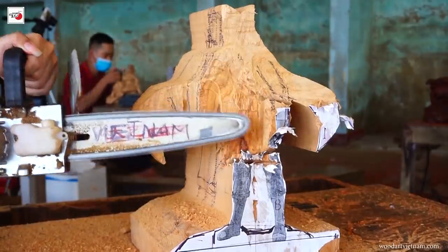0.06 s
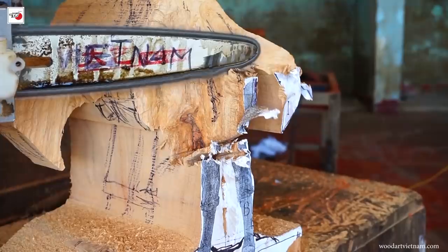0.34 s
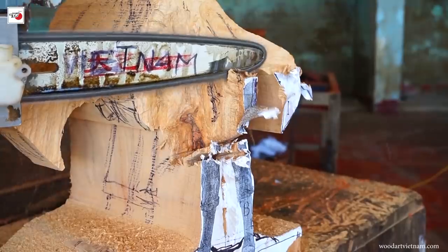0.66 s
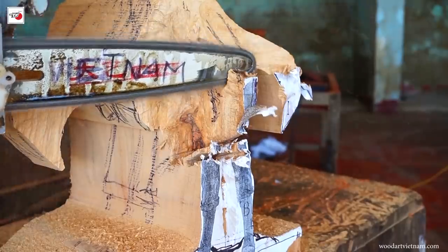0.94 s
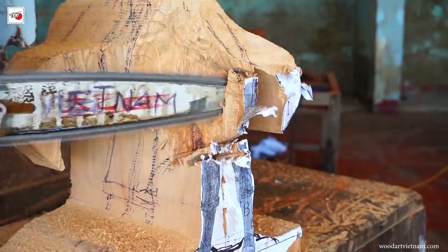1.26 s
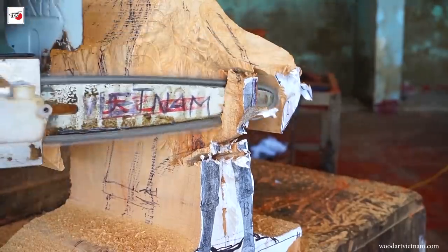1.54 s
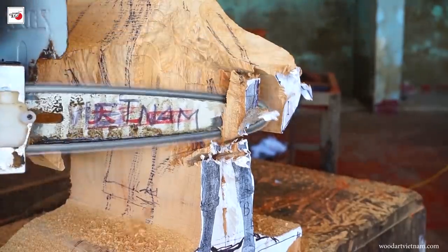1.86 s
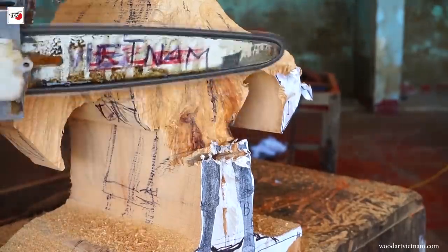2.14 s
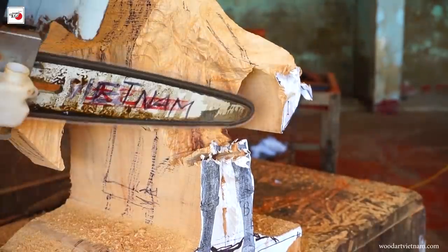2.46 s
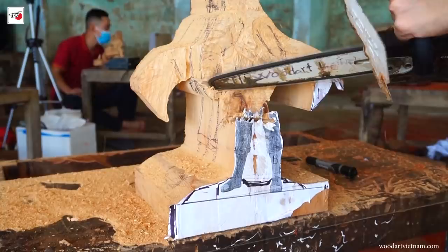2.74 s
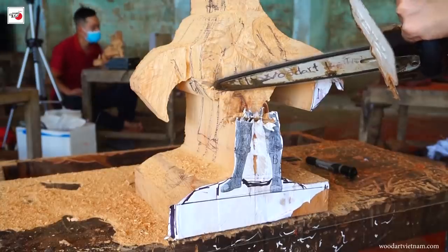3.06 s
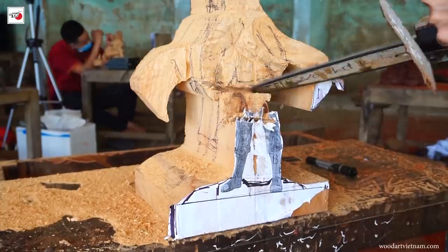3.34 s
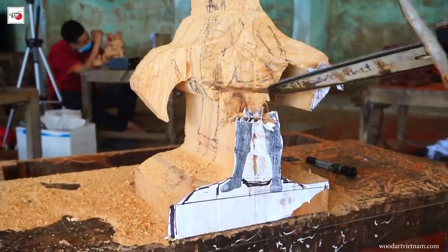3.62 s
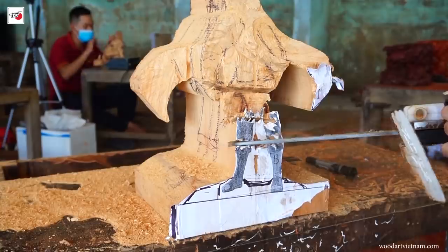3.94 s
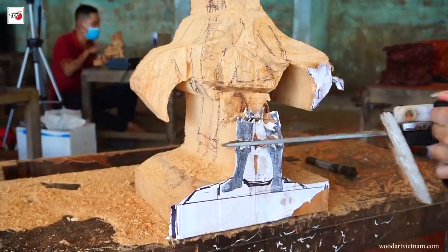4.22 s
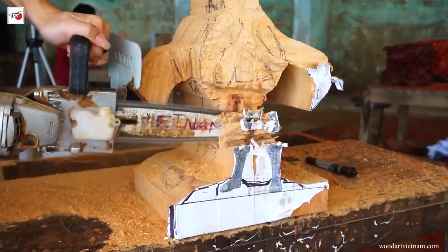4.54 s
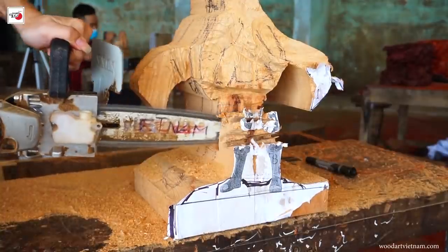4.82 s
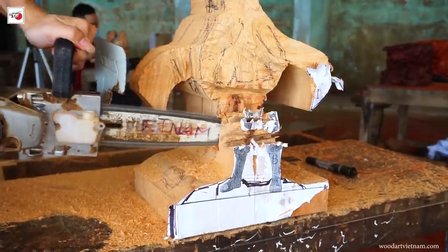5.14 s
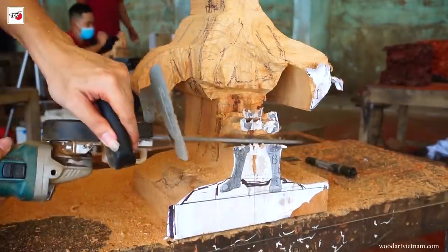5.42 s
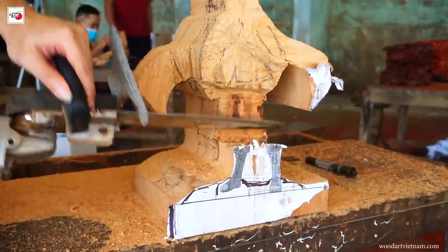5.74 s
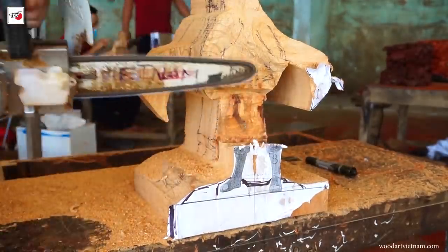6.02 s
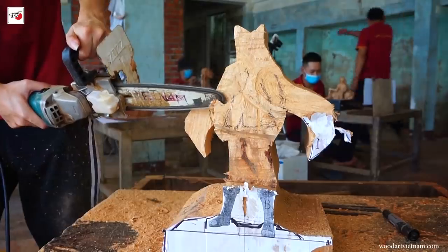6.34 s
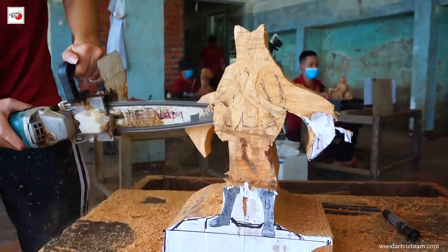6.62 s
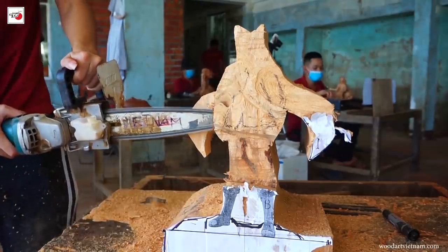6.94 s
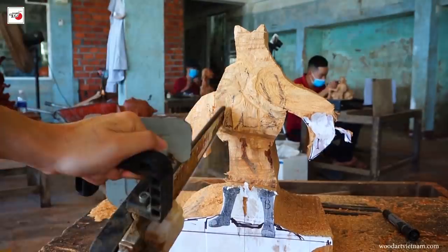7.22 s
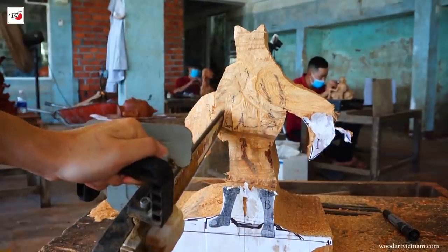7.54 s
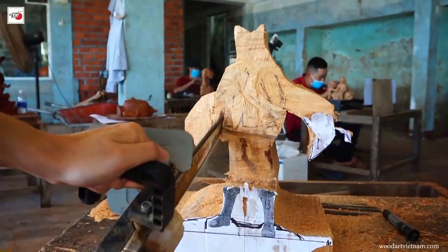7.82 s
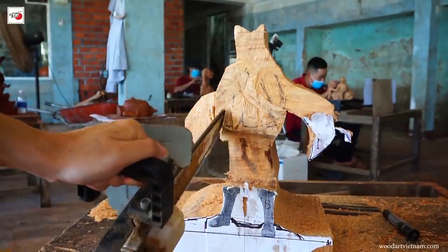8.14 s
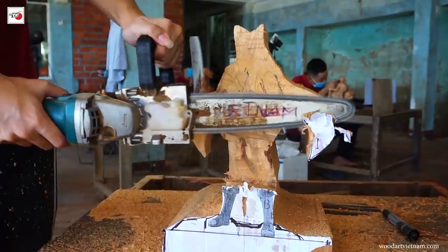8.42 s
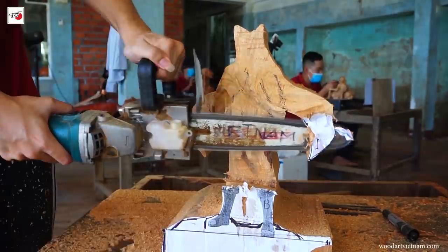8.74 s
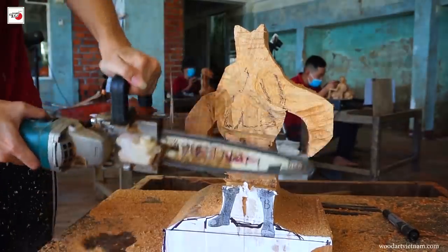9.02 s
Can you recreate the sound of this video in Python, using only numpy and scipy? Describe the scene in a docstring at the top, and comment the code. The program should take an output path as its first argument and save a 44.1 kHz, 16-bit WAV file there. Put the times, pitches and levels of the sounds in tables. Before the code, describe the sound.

Close, continuous power carving of wood: chain teeth tear and chips hiss, the tone shifting abruptly as the steel bar rings and squeals.

```python
"""Power carving at the bench

Close up in a workshop, in stereo: a chain bar on an electric grinder carves a wooden statue, the sound
changing abruptly from one stretch to the next. Teeth tear at the wood, chips hiss, the block knocks and
loose wood drops on the bench. The motor's whine sags under load; the bar rings and squeals in the kerf,
and near the end lies flat on the wood and growls."""
import sys
import numpy as np
from scipy import signal
from scipy.fft import rfft, irfft, next_fast_len
from scipy.io import wavfile
from scipy.ndimage import uniform_filter1d

SR = 44100
rng = np.random.default_rng(int(sys.argv[2]) if len(sys.argv) > 2 else 0)


def to_wav(sig):
    """Store sig (one row per channel, or 1-D mono) as 16-bit WAV at the path in sys.argv[1].

    Samples outside -1..1 are clipped; the rate is SR.
    """
    pcm = np.clip(np.atleast_2d(sig), -1, 1) * 32767
    pcm = np.round(pcm).astype(np.int16)
    wavfile.write(sys.argv[1], SR, pcm.T)  # frames by channels


N = 404838
T = np.arange(N) / SR
HZ = np.fft.rfftfreq(N, 1 / SR)


def amp(db):
    """Decibels to gain."""
    return 10 ** (np.asarray(db) / 20)


def unit(x):
    """Scales to rms 1."""
    return x / np.sqrt(np.mean(x ** 2) + 1e-20)


def curve_at(points, hz):
    """Joins a spectrum's points on a log-frequency axis."""
    point_hz, value = np.transpose(points)
    return np.interp(np.log(hz + 1), np.log(point_hz + 1), value)


def colour(x, gain):
    """Filters by a gain given on the frequency grid HZ."""
    size = next_fast_len(N)
    return irfft(rfft(x, size) * np.interp(np.fft.rfftfreq(size, 1 / SR), HZ, gain), size)[..., :N]


def wander(hz, on=slice(None)):
    """Random drift of rms 1, with about hz changes a second."""
    return unit(np.interp(T[on] * hz, np.arange(N // 8), rng.standard_normal(N // 8)))


def gate(start, end, fade_s):
    """1 between two times, with sloping ends."""
    return np.clip((T - start) / fade_s + .5, 0, 1) * np.clip((end - T) / fade_s + .5, 0, 1)


# How alike the left and right microphones hear the bench: frequency_hz, correlation
MIC_LIKENESS = [(60, .7), (350, 1), (700, 0.96), (2800, 0.58), (5600, 0.2), (16000, .11)]


def spread(pair, gain):
    """Colours two unrelated signals into left and right: bass alike, treble diffuse, middle at rms 1."""
    alike = np.clip(curve_at(MIC_LIKENESS, HZ), 0, 1)
    mid = colour(pair[0], gain)
    side = colour(pair[1], gain * np.sqrt((1 - alike) / (1 + alike)))
    return np.array([mid + side, mid - side]) / mid.std()


def noise_band(hz, width_hz):
    """A band of noise along a pitch curve, at both microphones; a fuzzy note when narrow."""
    pole = np.exp(-np.pi * width_hz / SR)
    noise = rng.standard_normal((2, len(hz))) + 1j * rng.standard_normal((2, len(hz)))
    slow_noise = signal.lfilter([1], np.poly([pole, pole]), noise)
    left, other = (slow_noise * np.exp(2j * np.pi * np.cumsum(hz) / SR)).real
    alike = np.clip(curve_at(MIC_LIKENESS, hz), 0, 1)
    return unit(np.array([left, alike * left + np.sqrt(1 - alike ** 2) * other]))


# Stretches of sawing, each changing abruptly to the next in loudness, colour and position:
# start_s, first_bite_db, last_bite_db, hiss_db, block_db, left_over_right_db, chatter_db, edge_db
STRETCHES = [(0, -24.4, -25.3, -23.2, -54, 3.5, 0.5, 1.5), (.355, -30.4, -27.3, -25.3, -66.5, 5.5, 1.6, -3),
             (.92, -29.7, -32.7, -28.2, -71, 4.5, 2.9, -4.5), (1.45, -26.5, -22, -23.5, -59.5, 2, 1.5, 0),
             (1.85, -23, -26.8, -22.8, -68, 1.8, 1.2, -1), (2.3, -28.3, -27.3, -23, -73, 2.5, 2.3, -1),
             (2.8, -26.6, -23.6, -22.8, -61, -1.9, 0.5, -.5),
             (3.43, -25.6, -23.7, -24.4, -61, -1.9, 1, -0.5), (3.75, -22, -24.5, -22.5, -55, -2, 0, .3),
             (4.33, -23, -23.5, -23.3, -48.5, 1.4, 2, 0.5),
             (5.25, -21.7, -23.6, -23.1, -54.5, .6, 0.9, 1.2),
             (6.17, -23.4, -22.1, -22.4, -57.5, 1.3, 0.2, .7),
             (7.199, -21.6, -22.3, -24.8, -47, 1.4, 1.2, 3.3),
             (8.3, -22.7, -22.2, -24.5, -48, 1.6, 1.7, 1.5), (8.969, -24.4, -24.4, -23.6, -57, 3, 2, 1.5)]
HISS, BLOCK, PAN, CHATTER, EDGE = range(3, 8)


def stretch_number():
    """Which stretch is under way at each moment."""
    return np.maximum(np.searchsorted([row[0] for row in STRETCHES], T, side="right") - 1, 0)


def eased(steps, change_s=.012):
    """Turns each step into a very short ramp."""
    return uniform_filter1d(steps, round(change_s * SR))


def held(column):
    """One setting of the stretches, as eased steps over time."""
    return eased(np.array(STRETCHES)[stretch_number(), column])


# Teeth snag (+) or slip (-) in the wood: middle_s, length_s, bite_db, hiss_db, block_db
SNAGS = [(3.385, .09, 2, -1, 0), (4.568, .06, 3, 2.5, 4), (6.24, 0.14, 0, -2.5, 11), (7.44, .07, 0, -5, 0),
         (8.01, .26, .3, 0.5, -15), (8.394, .09, -1.8, -1.8, -0.5)]


def feed(hiss_follows=.57, block_follows=.78):
    """The bite grows or eases through a stretch; hiss and block follow, snags ride on top, all in dB."""
    start, first_db, last_db = np.array(STRETCHES)[:, :3].T
    length, stretch = np.diff(start, append=N / SR), stretch_number()
    progress = (T - start[stretch]) / length[stretch]
    push_db = eased((last_db - first_db)[stretch] * (progress - .5))
    levels = np.array([eased((first_db + last_db)[stretch] / 2) + push_db,
                       held(HISS) + hiss_follows * push_db,
                       held(BLOCK) + block_follows * push_db])
    for middle, span, *change_db in SNAGS:
        on = abs(T - middle) < span / 2
        levels[:, on] += np.outer(change_db, np.cos(np.pi * (T[on] - middle) / span))
    return levels


def strikes(cycles, scatter_db=1.5, tear=1.6):
    """Once a cycle the steel bites with a random force, then tears fibres until the next strike."""
    force = amp(scatter_db * np.clip(rng.standard_normal(N // 8), -2, 1))[cycles.astype(int)]
    fibres = (tear + np.exp(-2 * (cycles % 1))) * rng.standard_normal((2, N))
    return unit(force * fibres)


# Tearing wood, close to the kerf: frequency_hz, density_db
RASP_SPECTRUM = [(90, -46.5), (260, -41.5), (480, -32), (760, -12.5), (1300, -8.5), (2100, -2), (2800, -2),
                 (3700, 1.6), (4200, 2), (4900, -2.5), (6200, -1), (8400, -5), (10000, -11), (16000, -18)]


def rasp(teeth, shake, edge_hz=5700, edge_octaves=.16):
    """Teeth tear the fibres; the sharp edge of the sound is duller or brighter in each stretch."""
    tearing = spread(strikes(teeth) * shake, amp(curve_at(RASP_SPECTRUM, HZ)))
    edge_band = np.exp(-.5 * (np.log2((HZ + 1) / edge_hz) / edge_octaves) ** 2)
    return tearing + (amp(held(EDGE)) - 1) * colour(tearing, edge_band)


# Chips leaving the chain: frequency_hz, density_db
CHIP_SPECTRUM = [(1500, -46), (5000, -4.5), (7400, -3), (8600, 1), (9800, -1.5), (11000, 2), (12500, 1.3),
                 (14700, 5)]


def chip_hiss(teeth, shake):
    """Chips hiss in time with the teeth."""
    return spread(strikes(teeth) * shake, amp(curve_at(CHIP_SPECTRUM, HZ)))


# The wooden block, midway between the microphones: frequency_hz, density_db
BLOCK_SPECTRUM = [(90, -26), (125, -16), (220, -17), (300, 1), (400, 5.2), (520, 3.5), (800, 8), (1400, -2),
                  (3000, -30)]


def block_knock(teeth, shake):
    """The striking teeth shake the whole block."""
    return spread(strikes(teeth) * shake, amp(curve_at(BLOCK_SPECTRUM, HZ)))


# Bands of noise in the sawing: start_s, end_s, first_hz, last_hz, width_hz, level_db
SAW_BANDS = [(0, .34, 3850, 3850, 1000, -29), (0, .34, 7600, 7900, 1100, -31),
             (.36, 1.421, 3540, 3540, 280, -37.5), (.55, 1.419, 7100, 6650, 850, -32),
             (1.5, 4.3, 6350, 6100, 500, -35), (2.8, 3.55, 3660, 3850, 220, -34.5),
             (3.4, 5.8, 1500, 1500, 800, -39.5), (4.3, 4.75, 8400, 8350, 300, -33),
             (6.2, 7.2, 10500, 10500, 2200, -31), (7.2, 8.3, 11150, 11150, 750, -31.5),
             (7.2, 8.32, 14150, 14300, 1100, -28), (6.2, 7.3, 6250, 6200, 280, -34),
             (6.2, 8.32, 8520, 8340, 330, -32.5), (6.4, 7.22, 765, 720, 35, -45.5),
             (7.2, 8.3, 1660, 1730, 200, -37.5), (7.22, 8.08, 2020, 2110, 100, -37),
             (7.96, 8.3, 3560, 3740, 160, -31), (7.95, 8.95, 6250, 6400, 280, -30)]


def saw_bands(fade_s=.06, swell_db=3, swell_hz=9):
    """Bands of noise swell and fade, from narrow rings to broad midrange rasp and high hiss."""
    out = np.zeros((2, N))
    for start, end, first_hz, last_hz, width_hz, db in SAW_BANDS:
        envelope = gate(start, end, fade_s)
        on = envelope > 0
        swell = unit(amp(2 * swell_db * np.tanh(wander(swell_hz, on) / 2)))
        hz = np.interp(T[on], [start, end], [first_hz, last_hz])
        out[:, on] += amp(db) * envelope[on] * swell * noise_band(hz, width_hz)
    return out


def rails(modes_hz=(3470, 3610, 3770, 4090), width_hz=35, swell_db=5, swell_hz=4):
    """The steel rails ring in close modes; each swells and fades on its own as the contact shifts."""
    return unit(sum(noise_band(np.full(N, hz), width_hz)
                    * amp(2 * swell_db * np.tanh(wander(swell_hz) / 2)) for hz in modes_hz))


def bench_reflections(x, echo_gain=.096, count=10, delay_s=(.001, .022)):
    """Close reflections off the bench and statue ripple the spectrum, differently in every stretch."""
    out, stretch = x.copy(), stretch_number()
    for k in range(len(STRETCHES)):
        share = eased((stretch == k).astype(float))
        on = np.flatnonzero(share > 1e-6)
        delays = rng.uniform(*delay_s, count)
        echoes = sum(rng.choice([-1, 1]) * x[:, on - int(delay * SR)] for delay in delays)
        out[:, on] += echo_gain * share[on] * echoes
    return out / np.sqrt(1 + count * echo_gain ** 2)


def sawing(tooth_hz=620, sag_per_db=.006, rasp_db=1.1, hiss_db=2.1, wood_db=5, rail_db=-14):
    """Teeth strike at a rate that sags with the bite, while the bar chatters unevenly in the kerf."""
    bite_db, chips_db, block_db = feed()
    speed = 1 - sag_per_db * (bite_db - bite_db.mean()) + .01 * wander(5)
    teeth = tooth_hz * np.cumsum(speed) / SR
    chatter = .53 * wander(330) + .44 * wander(75)
    shake = amp(held(CHATTER) * 2 * np.tanh(chatter / 2))  # the kerf limits the swing
    shake /= np.sqrt(uniform_filter1d(shake ** 2, 8000))
    tearing = rasp(teeth, shake) * amp(bite_db + rasp_db)
    chips = chip_hiss(teeth, shake) * amp(chips_db + hiss_db)
    block = block_knock(teeth, shake) * amp(block_db + wood_db)
    bands = saw_bands() + rails() * amp(bite_db + rail_db)
    saw = tearing + chips + (bands + chip_sprays()) * shake + motor()
    return bench_reflections(saw), bench_reflections(block)


# Loose wood landing on the bench: start_s, level_db, t60_s, low_cut_hz
WOOD_DROPS = [(.255, -37, .35, 400), (5.846, -33.5, .25, 100), (5.905, -44, .25, 60)]
# The body of each landing: frequency_hz, density_db
DROP_SPECTRUM = [(40, -30), (130, -1.5), (620, 4.5), (1000, -2), (3000, -40)]


def wood_drops():
    """Quickly dying knocks of wood on wood: a light piece clacks, a heavy one thuds."""
    out = np.zeros((2, N))
    for start, db, t60, low_cut_hz in WOOD_DROPS:
        low_cut = HZ ** 2 / (HZ ** 2 + low_cut_hz ** 2)
        body = spread(rng.standard_normal((2, N)), amp(curve_at(DROP_SPECTRUM, HZ)) * low_cut)
        out += body * amp(db - 60 * np.maximum(T - start, 0) / t60) * (T >= start)
    return out


# The motor, one curve for each time it carries over the sawing: time_s, pitch_hz, level_db
MOTOR_WHINES = [
    [(1.45, 6200, -43), (1.62, 5850, -38), (2.22, 7500, -41), (2.55, 7050, -42)],
    [(7.4, 5560, -35), (7.9, 5450, -38), (8.12, 6050, -35)],
]


def motor(width_hz=120, fade_s=.06):
    """The grinder's whine sinks as the chain is loaded and climbs as it runs free."""
    out = np.zeros((2, N))
    for curve in MOTOR_WHINES:
        times, hz, db = np.transpose(curve)
        swell = gate(times[0], times[-1], fade_s)
        on = swell > 0
        whine = noise_band(np.interp(T[on], times, hz), width_hz)
        out[:, on] += amp(np.interp(T[on], times, db)) * swell[on] * whine
    return out


# The bar squealing down in the kerf: start_s, end_s, first_hz, last_hz, level_db
BAR_SQUEALS = [(1.65, 1.868, 4530, 4500, -34), (3.12, 3.46, 4010, 4105, -34.5),
               (5.4, 5.95, 3300, 3305, -33), (5.6, 6.6, 4075, 4105, -36.5), (6.35, 6.48, 6560, 6290, -34),
               (6.575, 6.645, 1935, 1900, -34), (7.985, 8.112, 710, 750, -39),
               (8.128, 8.3, 615, 592, -37.5), (8.195, 8.29, 1670, 1705, -32.5),
               (8.302, 9.25, 631, 620, -41), (8.79, 8.99, 762, 690, -32.5)]


def squeals(waver_hz=9, flutter_db=2.7, overtone_db=-17):
    """Stick and slip locks the bar on one note, which drifts as the kerf pinches it."""
    out = np.zeros(N)
    for start, end, first_hz, last_hz, db in BAR_SQUEALS:
        swell = gate(start, end, fade_s=.035)
        on = swell > 0
        hz = np.interp(T[on], [start, end], [first_hz, last_hz]) + waver_hz * wander(150, on)
        phase = 2 * np.pi * np.cumsum(hz) / SR
        note = np.sin(phase) + amp(overtone_db) * np.sin(2 * phase)
        out[on] += amp(db) * swell[on] * unit(note * amp(flutter_db * wander(40, on)))
    return out


# Soft bumps, dead centre: start_s
BUMP_TIMES = [1.665, 2.3, 6.17, 8.78]


def bumps(push_db=-41, t60_s=.005, cutoff_hz=700):
    """Very short, dull bumps under the sawing."""
    pushes = sum(amp(push_db - 60 * np.clip(T - start, 0, 1) / t60_s) * (T >= start)
                 for start in BUMP_TIMES)
    return colour(pushes, 1 / (1 + (HZ / cutoff_hz) ** 2))


# Sprays of fine chips, wide across the microphones: start_s, end_s, level_db
CHIP_SPRAYS = [(1.76, 2, -28), (2.31, 2.78, -21.5), (5.93, 6.01, -23), (8.18, 8.29, -24), (8.82, 8.98, -24)]


def chip_sprays(fade_s=.04, low_cut_hz=10300):
    """Fine chips stream out of the kerf and sizzle in the top octave."""
    flow = sum(amp(db) * gate(start, end, fade_s) for start, end, db in CHIP_SPRAYS)
    return flow * spread(rng.standard_normal((2, N)), 1 / (1 + (low_cut_hz / (HZ + 1)) ** 20))


# The bar chirping, pinched in the kerf: start_s, end_s, level_db
BAR_CHIRPS = [(6.192, 6.238, -28.5), (6.35, 6.44, -24), (6.446, 6.47, -28), (6.5, 6.574, -24),
              (6.572, 6.628, -30), (6.64, 6.694, -29), (7.95, 8.29, -39), (8.022, 8.11, -35),
              (8.16, 8.198, -27), (8.242, 8.278, -30)]
# The one sinking note they share: time_s, pitch_hz
CHIRP_NOTE = [(6.2, 1335), (6.7, 1280), (8.1, 1255), (8.19, 1212)]


def chirps(ring_s=.009, waver_hz=11, flutter_db=2):
    """The pinched bar catches and lets go, so its note stutters in short swells as it sinks."""
    grip = np.zeros(N)
    for start, end, db in BAR_CHIRPS:
        progress = np.clip((T - start) / (end - start), 0, 1)
        grip += amp(db) * np.sqrt(abs(np.sin(np.pi * progress)))
    hz = np.interp(T, *np.transpose(CHIRP_NOTE)) + waver_hz * wander(150)
    note = np.sin(2 * np.pi * np.cumsum(hz) / SR) * amp(flutter_db * wander(70))
    pole = np.exp(-1 / (ring_s * SR))
    return signal.lfilter([1 - pole], [1, -pole], grip) * unit(note)


# Modes of the bar lying flat on the statue: pitch_hz, width_hz, level_db
BAR_MODES = [(734, 56, -2.5), (889, 72, 1), (1039, 69, 2.5), (1130, 87, 0), (1246, 130, 1), (1388, 70, 2.3),
             (1780, 310, -2.5)]


def growl(start_s=8.3, lift_s=8.98, start_db=-27.3, press_db_per_s=3.5, lift_db_per_s=75,
          rattle_hz=165, low_cut_hz=330):
    """Laid flat, pressed ever harder, then lifted, the bar rattles and rings in its bending modes."""
    modes = sum(amp(db) / np.sqrt(width) / (1 + 2j * (HZ - hz) / width) ** 2
                for hz, width, db in BAR_MODES)
    radiated = modes * HZ ** 2 / (HZ ** 2 + low_cut_hz ** 2)  # the bar gives off little bass
    cycles = np.cumsum(rattle_hz * (1 + .04 * wander(40))) / SR
    rattle = spread(strikes(cycles, tear=.11), radiated)
    pressure_db = start_db + press_db_per_s * (T - start_s) - lift_db_per_s * np.maximum(T - lift_s, 0)
    return rattle * amp(pressure_db) * gate(start_s, np.inf, fade_s=.0087)


def at_microphones(saw, lag_s_per_db=7e-6, narrow_from_s=6.17, narrow_db=-1.5):
    """The saw is louder and earlier at the nearer microphone; it sounds narrower towards the end."""
    pan_db, mid = held(PAN), saw.mean(0)
    width = amp(narrow_db * (T > narrow_from_s))
    left, right = (mid + width * (saw - mid)) / np.sqrt((1 + width ** 2) / 2)
    lag = np.round(lag_s_per_db * pan_db * SR).astype(int)
    right = right[np.clip(np.arange(N) - lag, 0, N - 1)]
    sides = amp(np.outer([.5, -.5], pan_db))
    return np.array([left, right]) * sides / sides.mean(0)


def scene():
    """Facing the bench: the saw sounds from the side it is held on, block and bench from the middle."""
    saw, block = sawing()
    return at_microphones(saw + squeals() + chirps()) + block + growl() + wood_drops() + bumps()


def record(dry):
    """Both microphone channels roll off steeply at 15.8 kHz."""
    low_pass = signal.firwin(1023, 15810, window=("kaiser", 9), fs=SR)
    return signal.oaconvolve(dry, low_pass[None], "same")


dry = scene()
out = record(dry)
to_wav(out)
```